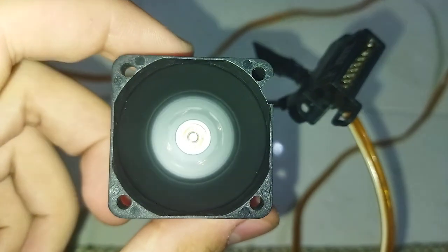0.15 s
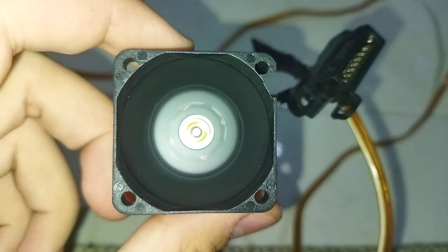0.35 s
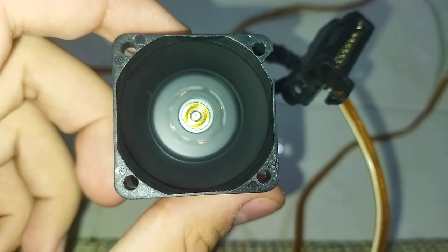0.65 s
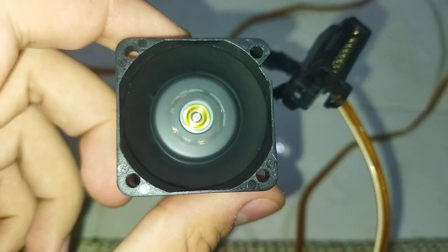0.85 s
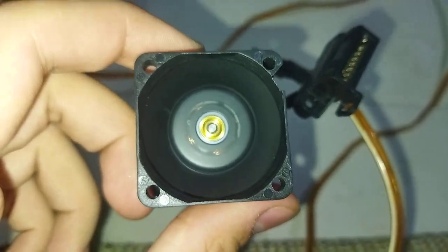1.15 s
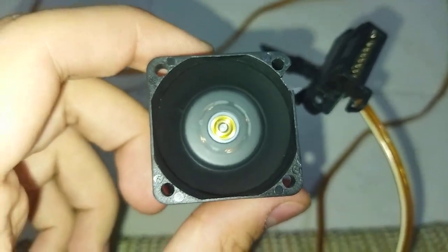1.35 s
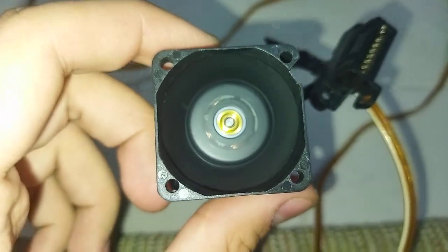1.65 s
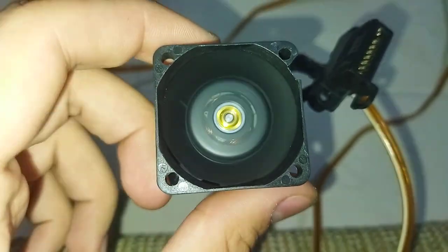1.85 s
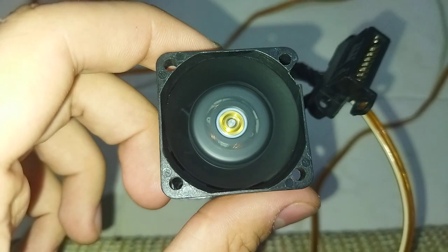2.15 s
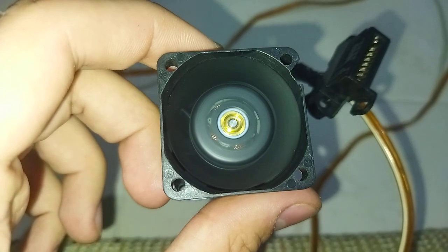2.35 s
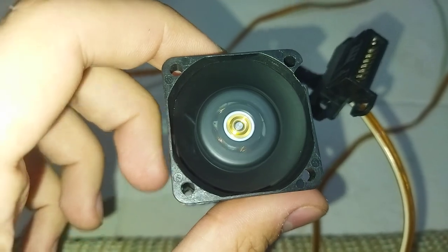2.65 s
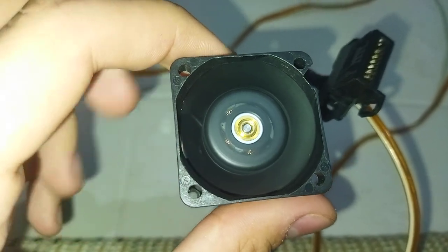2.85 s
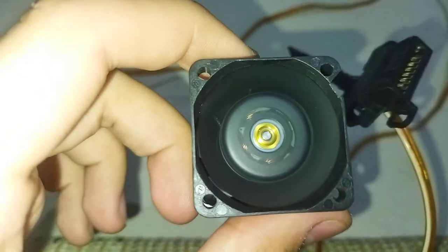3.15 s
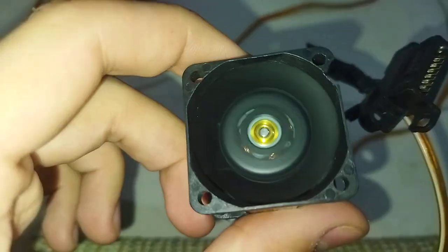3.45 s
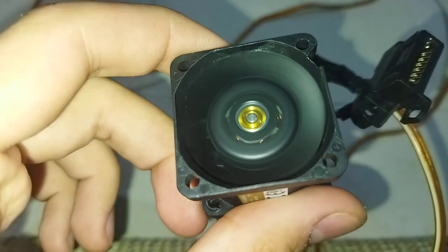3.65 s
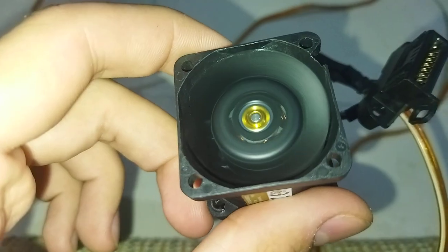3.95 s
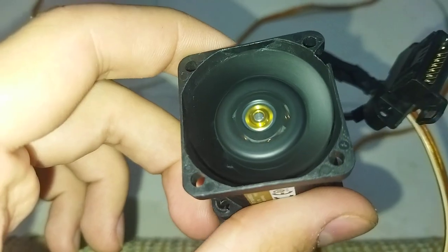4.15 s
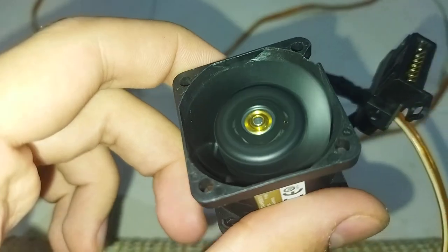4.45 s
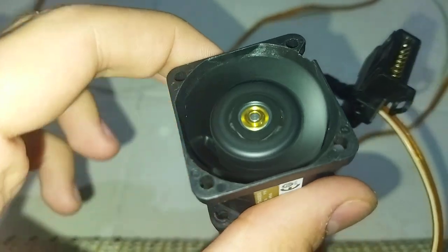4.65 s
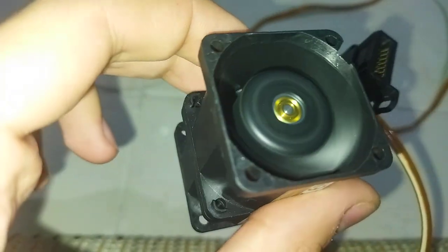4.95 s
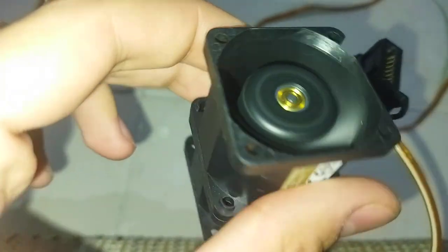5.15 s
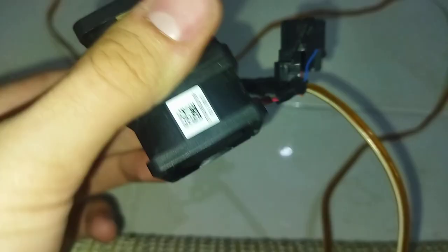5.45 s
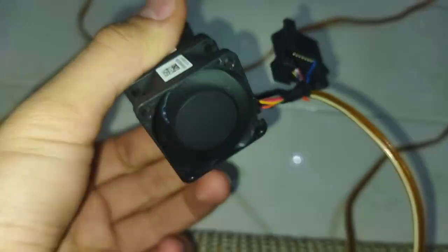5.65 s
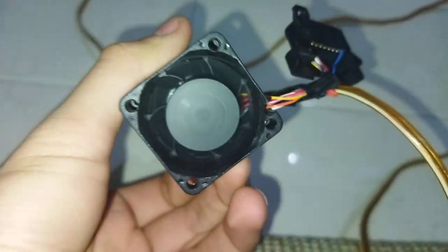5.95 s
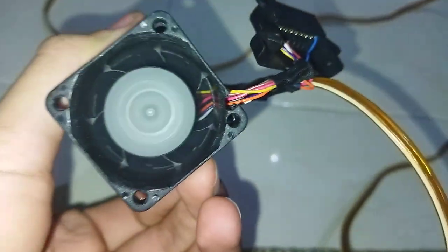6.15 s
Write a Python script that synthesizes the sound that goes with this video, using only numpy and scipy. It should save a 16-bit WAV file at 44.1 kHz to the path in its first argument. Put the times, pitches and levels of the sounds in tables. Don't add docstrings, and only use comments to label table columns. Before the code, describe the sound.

A small high-speed fan held close to a stereo microphone in a quiet room. Its buzzing whine starts already in motion, climbs fast, then more slowly, and settles into a shrill steady chord over dense rushing air. Tilting and turning the fan shifts the tones and their balance. At the end the air jet hits the left side with a dull slap and rough, overloaded wind rumble.

```python
import sys
import numpy as np
from scipy import signal
from scipy.fft import rfft, irfft, next_fast_len
from scipy.io import wavfile
from scipy.ndimage import uniform_filter1d

SR = 44100
rng = np.random.default_rng(int(sys.argv[2]) if len(sys.argv) > 2 else 0)


def magnitude_from_level(level_db):
    exponent = np.asarray(level_db, float) / 20
    return 10 ** exponent


def to_wav(sig):
    pcm = np.clip(np.atleast_2d(sig), -1, 1) * 32767
    pcm = np.round(pcm).astype(np.int16)
    wavfile.write(sys.argv[1], SR, pcm.T)


N = 276948
STEP = 32
LEFT, RIGHT = np.array([[1], [0]]), np.array([[0], [1]])


def control_time_s():
    return np.arange(0, N + STEP, STEP) / SR


def in_time(rows):
    time_s, *columns = np.transpose(rows)
    return np.array([np.interp(control_time_s(), time_s, column) for column in columns])


def fine(curves):
    return np.array([np.interp(np.arange(N) / STEP, np.arange(len(c)), c) for c in curves])


def at_hz(points, hz):
    point_hz, value = np.transpose(points)
    return np.interp(np.log(hz + 1), np.log(point_hz), value)


def drift(rate_hz, count):
    pole = np.exp(-2 * np.pi * rate_hz * STEP / SR)
    run_in = 2000
    white = rng.standard_normal((count, run_in + len(control_time_s())))
    slow = signal.lfilter([1], [1, -2 * pole, pole * pole], white)[:, run_in:]
    return slow / slow.std(axis=1, keepdims=True)


def pose():
    # (time [s], carried to the right [0-1], turned [deg], nearer [dB])
    hand = [(0, 0.25, 2.1, 0.56), (1.5, 0.35, 3, -0.07), (2.7, 0.86, 2.88, 0.37), (3.55, 0.98, 3.16, 0.45),
            (3.7, 0.93, 18.6, 0.34), (4.7, 0.92, 27, 0.1), (5.05, 0.99, 34, -0.2), (5.3, 1, 52, -.3),
            (5.55, 0.7, 82, 0.2), (5.78, 0.86, 130, 0.5), (6.0, .95, 140, 0.8), (6.28, 0.9, 178, 1.5)]
    across, degrees, near_db = in_time(hand)
    angle = np.radians(degrees)
    tilt = np.abs(np.sin(angle))
    edge = tilt ** 12
    rear_side = np.maximum(-np.cos(angle), 0)
    duck_from_s, duck_time_s = 5.79, 0.039
    since_s = np.maximum(control_time_s() - duck_from_s, 0)
    ducked = 1 - np.exp(-since_s / duck_time_s)
    near_db = near_db * np.array([1 - ducked, 1 + 0 * ducked])
    return across, tilt, edge, rear_side, near_db, ducked


def echoes(hz):
    # (time [s], pitch [Hz], half length [s], left [dB], right [dB])
    reflections = [(0.56, 2990, .15, -12, -7), (0.71, 2540, 0.28, 9, 4), (1.35, 2750, 0.29, 5.5, -5),
                   (1.06, 1565, .25, -4.5, -4), (1.5, 3480, .3, 2, -6), (1.85, 5600, 0.28, 8.5, 0.1),
                   (2.04, 1955, 0.34, 6, 0.1), (2.57, 1787, 0.24, -1, -9.5), (2.36, 3730, 0.1, 8, -3),
                   (2.42, 1980, 0.11, 2.5, 8), (2.35, 2965, 0.49, -10, -6), (1.69, 957, 0.077, 1.7, 5.5),
                   (3.17, 1800, 0.19, 4, 7), (2.3, 3480, 0.21, 4, 6), (3.8, 1804, 0.061, -12, -7),
                   (4.34, 1996, .4, 2.5, 3.5), (4.62, 1806, 0.13, -20, -7), (4.9, 1803, 0.072, 3.5, -8),
                   (4.2, 5790, 0.34, 7, 9), (7, 3800, 0.11, -7, 0.1), (5.074, 2995, 0.18, -10, -17),
                   (5.3, 5390, 0.094, 2.2, -9), (5.3, 2200, 0.081, 8.5, 5), (1.6, 4950, .3, -9, -8)]
    time_s, centre_hz, length_s, left_db, right_db = np.transpose(reflections)[:, :, None]
    width = 0.03
    off_time = (control_time_s() - time_s) / length_s
    off_pitch = np.log(hz / centre_hz) / width
    near = np.exp(-off_time ** 2 - off_pitch ** 2)
    return np.array([(left_db * near).sum(axis=0), (right_db * near).sum(axis=0)])


def air_level(speed_db):
    # (growth [dB per dB of speed],
    # face-on [dB], edge-on [dB], rear-facing [dB], left port ducked [dB])
    air_rule = [(1.4, 0.38, -0.7, 0.1, -28), (1.6, -2.5, -2.5, -1.5, -1.3), (2.5, 0.3, -4, 4.5, -12.5),
                (2, -2.5, 1, 3, 1.2)]
    air_over_db = [
        [-0.15],
        [1.25],
        [-.3],
        [0.46],
    ]
    across, tilt, edge, rear_side, near_db, ducked = pose()
    power, face_db, edge_db, rear_db, duck_db = np.transpose(air_rule)[:, :, None]
    rush_db = power * speed_db + face_db + edge_db * edge + rear_db * rear_side + duck_db * ducked
    rush_db = rush_db + np.array(air_over_db) * across * (1 + np.tanh(3.6 * tilt))
    rush_db = rush_db + np.tile(near_db, (2, 1))
    rumble_db = 0.89 * rush_db[:2] + np.array([[2.5], [3.5]]) * np.tanh(3.7 * tilt)
    return np.vstack([rush_db, rumble_db])


def rushing_air(level_db):
    # (frequency [Hz], left level [dB per Hz])
    air_left = [(60, -85), (150, -76), (400, -77), (1400, -65), (1750, -61), (1980, -63.5), (2350, -59),
                (3500, -59), (5000, -60.5), (7300, -61), (9100, -52.5), (11350, -61.5), (11750, -58),
                (15500, -63)]
    # (frequency [Hz], right level [dB per Hz])
    air_right = [(60, -82.5), (150, -80), (900, -74), (1080, -73), (1720, -65.5), (1950, -63.5),
                 (3500, -62), (5300, -63), (6300, -61.5), (7300, -63.5), (9300, -80), (11350, -75.5),
                 (11900, -62.5), (15500, -75)]
    # (frequency [Hz], likeness of the ports [0-1])
    likeness = [(200, 0.8), (500, 0.4), (1300, 1), (2220, 0.76), (2550, 0.57), (3600, 0.13), (4600, 0.45),
                (8000, 0), (12500, 0.1)]
    # (frequency [Hz], left lead [rad])
    left_lead = [(200, 0), (1000, 1.3), (1900, 4), (2250, 4), (2900, 6), (5500, 12), (12200, 28.5),
                 (15000, 38.5)]
    rumble_hz, bass_hz, treble_hz = 285, 1750, 6550

    size = next_fast_len(N)
    hz = np.arange(size // 2 + 1) * SR / size
    shared, *own = rfft(rng.standard_normal((3, size))) * np.sqrt(SR / 2)
    alike = np.clip(at_hz(likeness, hz), 0, 1)
    lead = np.exp(1j * np.interp(hz, *np.transpose(left_lead)) * LEFT)
    ports = np.sqrt(alike) * shared * lead + np.sqrt(1 - alike) * np.array(own)
    ports = ports * magnitude_from_level(np.array([at_hz(air_left, hz), at_hz(air_right, hz)]))

    rumble = 1 / (1 + (hz / rumble_hz) ** 4)
    bass = 1 / (1 + (hz / bass_hz) ** 12)
    treble = 1 / (1 + (treble_hz / (hz + 1)) ** 12)
    parts = [(rumble, level_db[4:]),
             (bass - rumble, 0.83 * level_db[:2]),
             (1 - bass - treble, level_db[:2]),
             (treble, level_db[2:4])]
    out = 0
    for part, part_db in parts:
        gain = fine(magnitude_from_level(part_db + 0.28 * drift(12.0, count=2)))
        out = out + irfft(ports * part, size)[:, :N] * gain
    return out


def jet():
    # (time [s], left level [dB], right level [dB])
    jet_level = [
        (5.64, -50, -35),
        (5.66, -62, -34),
        (5.78, -33, -27),
        (5.8, -13.5, -25),
        (5.85, -13.5, -29),
        (5.92, -12.5, -25),
        (6.02, -12.5, -31),
        (6.15, -7.5, -41.5),
        (6.28, -2.5, -38.5),
    ]
    # (time [s], share of fast small eddies [0-1])
    fast_share = [
        (5.86, 0.011),
        (6.0, 0.85),
        (6.15, 0.75),
        (6.28, 1),
    ]
    # (frequency [Hz], level [dB])
    slow_eddies = [(40, -18), (130, -0.5), (200, -1), (450, -10), (800, -19), (1500, -36), (9000, -75)]
    # (frequency [Hz], level [dB])
    fast_eddies = [(40, -41), (200, 0.5), (450, 1.5), (800, -4.5), (1500, -14.5), (2300, -26), (3300, -28),
                   (9000, -64)]

    size = next_fast_len(N)
    hz = np.arange(size // 2 + 1) * SR / size
    white = rfft(rng.standard_normal((2, size)))
    slow = irfft(white * magnitude_from_level(at_hz(slow_eddies, hz)), size)[:, :N]
    fast = irfft(white * magnitude_from_level(at_hz(fast_eddies, hz)), size)[:, :N]
    share = fine(np.clip(in_time(fast_share) * np.array([[1], [0.05]]), 0, 1))
    eddies = (1 - share) * slow / slow.std() + share * fast / fast.std()
    eddies = eddies / (uniform_filter1d(eddies ** 2, size=900) + 0.05) ** 0.21

    time_s = np.arange(N) / SR
    reached = np.arange(N) >= jet_level[0][0] * SR
    level_db = in_time(jet_level) + 1.5 * LEFT + 2.0 * drift(24.7, count=2)
    since_s = time_s - 5.797
    slap = magnitude_from_level(-4.0) * np.exp(-(since_s / 0.0034) ** 2) * np.sin(2 * np.pi * 250.0 * since_s) * LEFT
    return slap + reached * eddies * fine(magnitude_from_level(level_db))


def tone(angle, level_db, lead, flutter, haze):
    slow, fast = drift(9.9, count=4), drift(58.0, count=2)
    shake = 1 + flutter * (slow[:2] + 1j * slow[2:]) + haze * (fast[0] + 1j * fast[1])
    steady = np.sqrt(2 / (1 + 2 * flutter ** 2)) * magnitude_from_level(level_db)
    height = steady * shake * np.exp(1j * lead * LEFT)
    return fine(height.real) * np.cos(angle) - fine(height.imag) * np.sin(angle)


def rotor_tones(shaft_hz, speed_db):
    strong_orders = [
        (3, 0),
        (6, 0),
        (9, 0),
        (0, 5),
        (0, 15),
        (6, 5),
        (12, 5),
        (1, 0),
        (0, 1),
    ]
    # (left [dB], right [dB], left lead [rad], flutter [0-1], haze [0-1])
    strong_tones = [(-24, -34.5, 1.45, 0.03, 0), (-24.5, -33, 3, 0.1, 0.02), (-29, -35.5, 7.5, 0.17, 0.16),
                    (-31, -40, 1.6, 0.26, 0), (-42, -34.5, 1.5, 0.06, 0.27), (-37, -34, 3, 0.15, 0.26),
                    (-37, -41, 1.15, 0.26, 0.22), (-64.5, -56.5, -1.5, 0, .021), (-45.5, -49, -3, 0, 0)]
    # (growth [dB per dB of speed], right gain carried over [dB],
    # at full tilt: left [dB], right [dB], lead [rad])
    strong_growth = [(2.32, 6.04, 1, 3, .01), (2.6, 7.4, 1, 1.3, -0.64), (1.3, 3.62, 3.2, 4.5, -1.1),
                     (2.4, 10.5, 1, -0.5, .01), (1.6, 4.3, 5, 3.5, .01), (0.2, 2.47, -2.5, 5, 2.1),
                     (0.38, 0.7, 1.5, 1, .01), (1.7, 1.2, 16, 10, .01), (2, 4, 11, 0, 1.36)]
    # (edge-on left [dB], edge-on right [dB], rear-facing left [dB], right [dB], lead [rad])
    strong_turned = [(-12.5, -12, -5, 1.5, 0.7), (-19, -9, -16, -5.5, -2), (-3.5, -2, -1, 7, -1.5),
                     (-5, -14, -12, -8, 2), (-6, -11, -10, -7, 0.1), (14.5, -9, 4, -18, 4),
                     (6, 0, 3, -3, -2), (6.5, -7, -4, -5, 4), (-6, -1, -13, -14, -5)]
    spin_up_lead = [0.13, 0.016, 0.79, -.15, -0.18, 0.44, 1.03, -.1, -0.0068]
    # (front order, rear order, left [dB], right [dB], left lead [rad])
    weak_tones = [(9, -5, -45, -51, 2.5), (6, -1, -47.5, -59, 1), (3, 3, -39, -39.5, -3.5),
                  (3, 4, -66, -42.5, -4), (0, 7, -53, -38.5, -1), (6, 2, -49, -36.5, 3),
                  (3, 5, -41.5, -37.5, -0.5), (0, 8, -49, -49, 1.5), (0, 10, -36, -38.5, 0.06),
                  (12, 0, -46.5, -37.5, 6.5), (0, 13, -43, -38, -1), (9, 5, -49.5, -40.5, -4.5),
                  (15, 0, -37.5, -59, -0.5), (0, 14, -48, -46, 0.5), (18, 0, -43.5, -47, 1),
                  (9, 10, -43, -42.5, -8.5), (15, 5, -37, -40, 1), (0, 20, -39, -77, -1),
                  (18, 5, -40.5, -58, -1), (21, 5, -33, -56, 0.5), (0, 30, -52, -63, 4.5)]

    front, rear = 2 * np.pi * np.cumsum(fine(shaft_hz), axis=1) / SR
    across, tilt, edge, rear_side, near_db, ducked = pose()
    common_db = near_db - 11.5 * ducked * LEFT
    out = 0
    strong = zip(strong_orders, strong_tones, strong_growth, strong_turned, spin_up_lead)
    for (m, n), steady, growth, turned, rise in strong:
        left_db, right_db, lead, flutter, haze = steady
        power, over_db, tilt_left_db, tilt_right_db, tilt_lead = growth
        edge_left_db, edge_right_db, rear_left_db, rear_right_db, rear_lead = turned
        level_db = left_db * LEFT + (right_db + over_db * across) * RIGHT + power * speed_db + common_db
        level_db = level_db + (tilt_left_db * LEFT + tilt_right_db * RIGHT) * tilt
        level_db = level_db + (edge_left_db * LEFT + edge_right_db * RIGHT) * edge
        level_db = level_db + (rear_left_db * LEFT + rear_right_db * RIGHT) * rear_side
        level_db = level_db + echoes(m * shaft_hz[0] + n * shaft_hz[1])
        lead = lead + rise * speed_db + tilt_lead * tilt + rear_lead * rear_side
        out = out + tone(m * front + n * rear, level_db, lead, flutter, haze)
    for m, n, left_db, right_db, lead in weak_tones:
        level_db = left_db * LEFT + right_db * RIGHT + 4.0 * speed_db + 1.8 * common_db
        level_db = level_db + 1.16 * drift(0.56, count=2)
        level_db = level_db + echoes(m * shaft_hz[0] + n * shaft_hz[1])
        out = out + tone(m * front + n * rear, level_db, lead, flutter=0.32, haze=0.075)
    return out


def scene():
    # (time [s], front rotor [Hz], rear rotor [Hz])
    shaft_speed = [(0.0, 186.7, 226.2), (0.2, 218, 257.7), (0.35, 239.2, 273), (0.5, 261.3, 286.6),
                   (0.65, 274.6, 295.6), (0.8, 284.3, 303.4), (1.1, 298.9, 313.5), (1.5, 312.4, 330.5),
                   (1.75, 321, 337.7), (2.1, 326.8, 347.7), (2.5, 330.6, 356.4), (3.0, 333, 359),
                   (4.2, 331.5, 362), (5.2, 333, 360.6), (5.4, 333, 358), (5.8, 331.0, 362.5),
                   (6.28, 331.4, 362)]
    shaft_hz = in_time(shaft_speed)
    full_speed_hz = 332.5
    speed_db = 20 * np.log10(shaft_hz[0] / full_speed_hz)
    return rushing_air(air_level(speed_db)) + jet() + rotor_tones(shaft_hz, speed_db)


def top_cut(x):
    return signal.sosfilt(signal.butter(12, 15830, fs=SR, output="sos"), x)


def record(dry):
    high_pass = signal.butter(4, 72.0, "high", fs=SR, output="sos")
    thin = signal.sosfilt(high_pass, dry)
    overload = 0.77
    held = thin / (1 + np.abs(thin / overload) ** 4) ** 0.25
    return top_cut(held)


dry = scene()
out = record(dry)
to_wav(out)
```